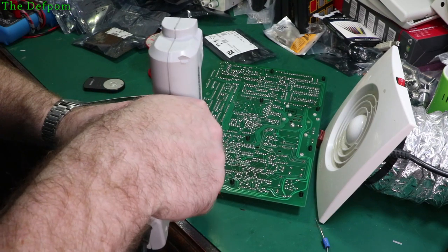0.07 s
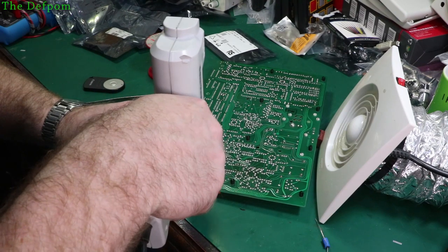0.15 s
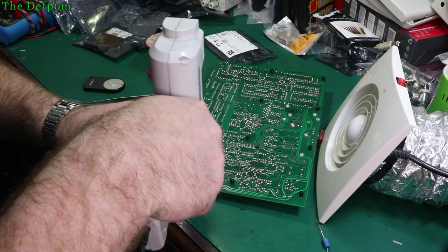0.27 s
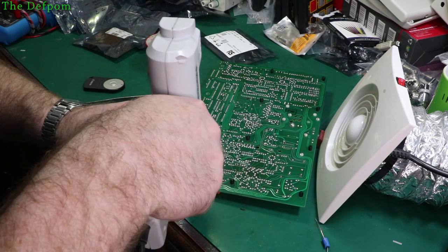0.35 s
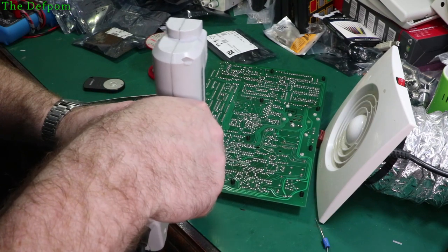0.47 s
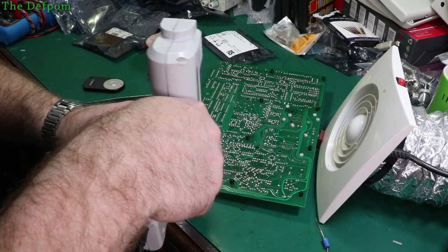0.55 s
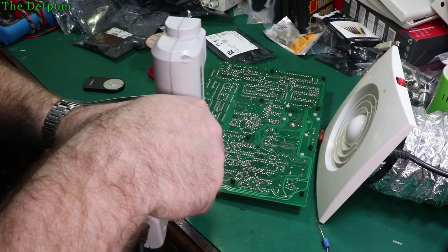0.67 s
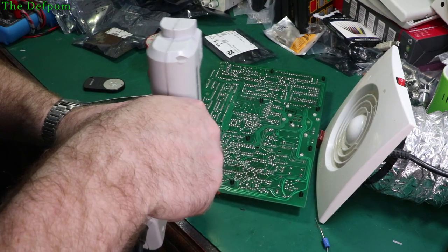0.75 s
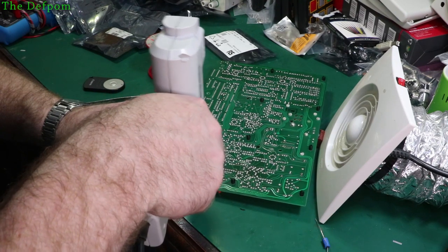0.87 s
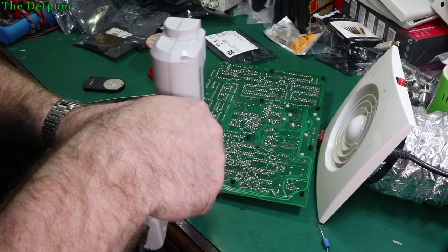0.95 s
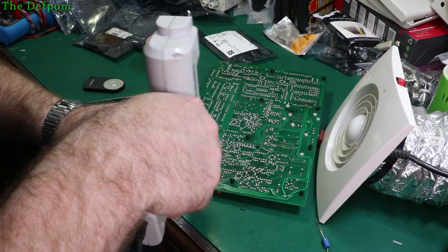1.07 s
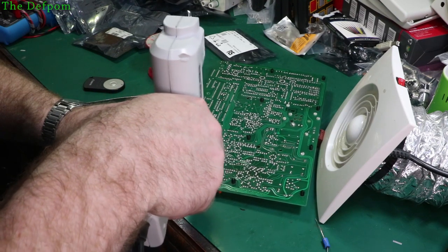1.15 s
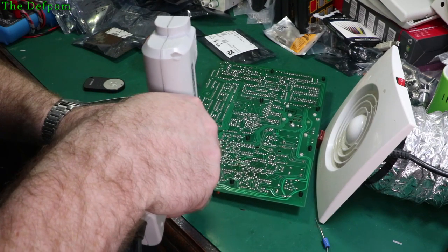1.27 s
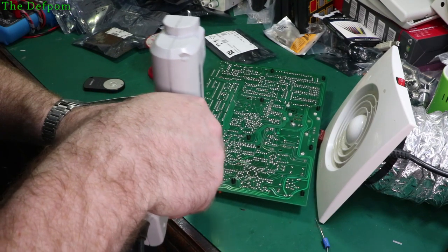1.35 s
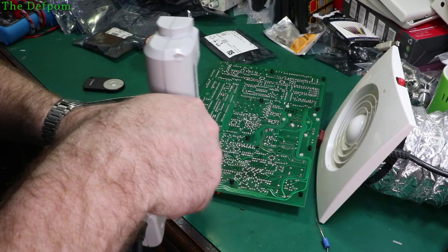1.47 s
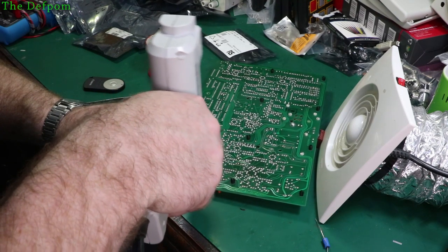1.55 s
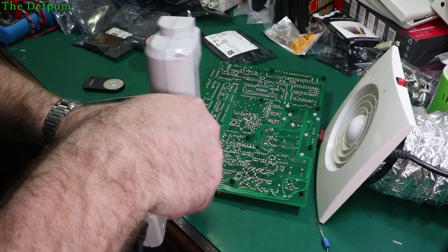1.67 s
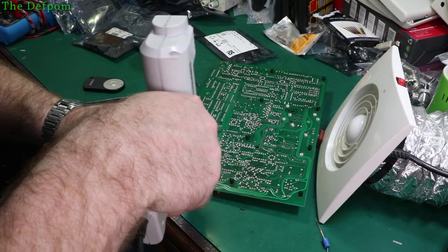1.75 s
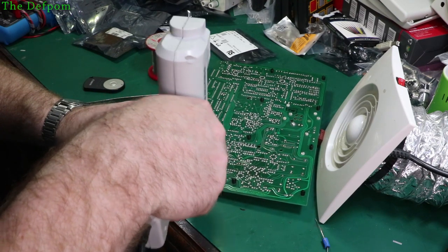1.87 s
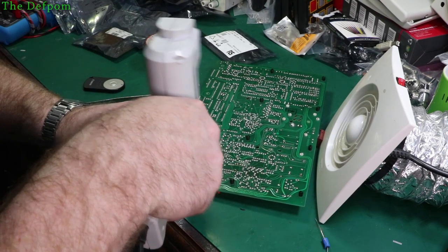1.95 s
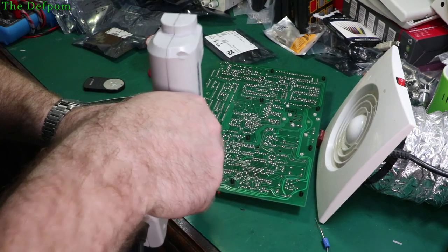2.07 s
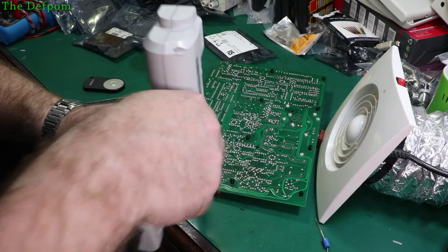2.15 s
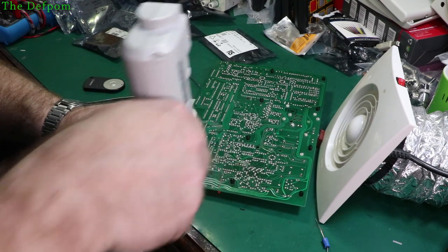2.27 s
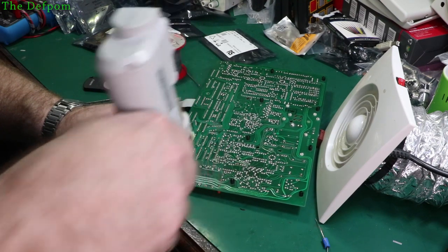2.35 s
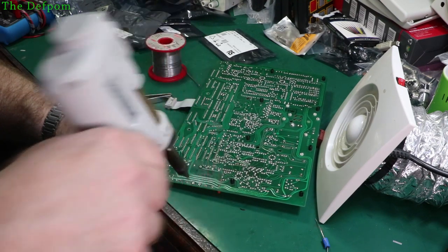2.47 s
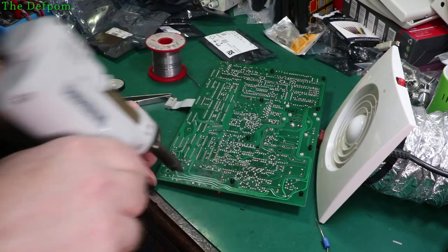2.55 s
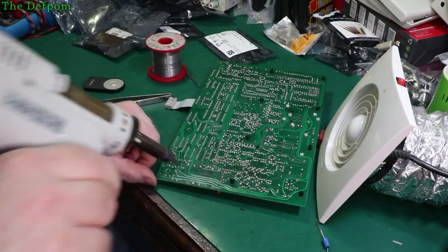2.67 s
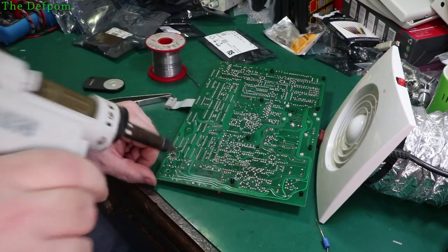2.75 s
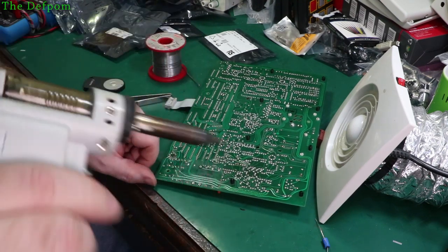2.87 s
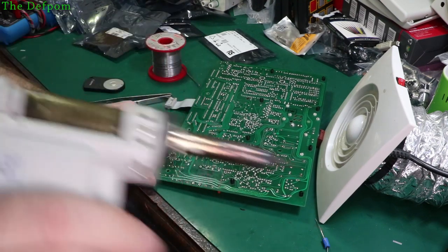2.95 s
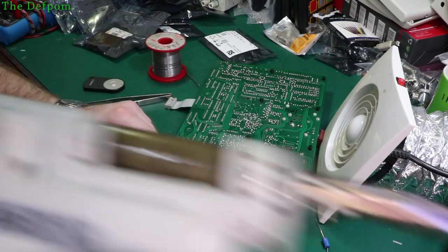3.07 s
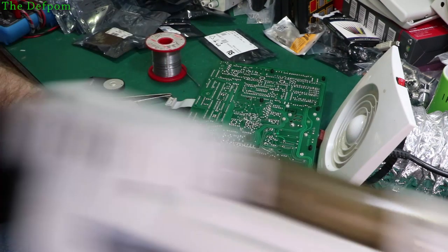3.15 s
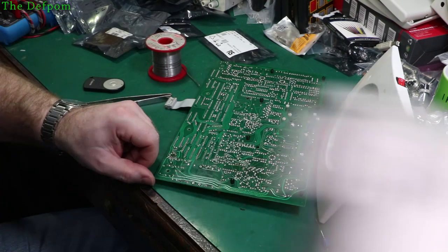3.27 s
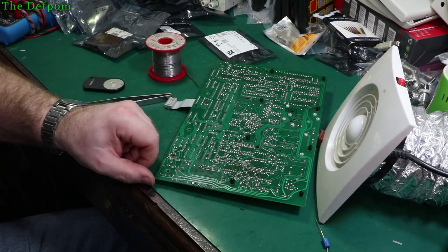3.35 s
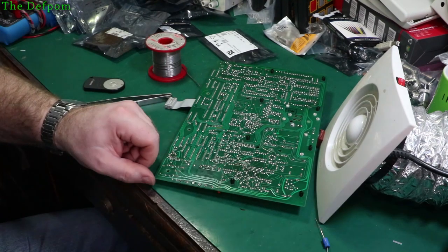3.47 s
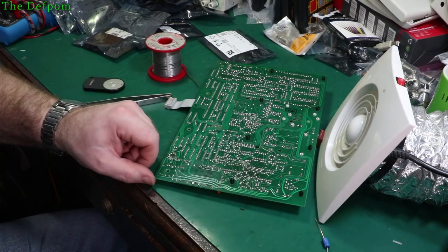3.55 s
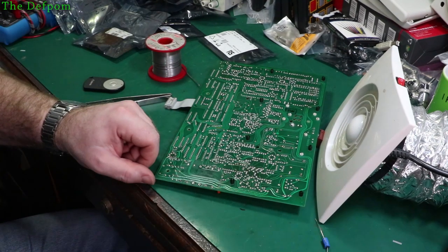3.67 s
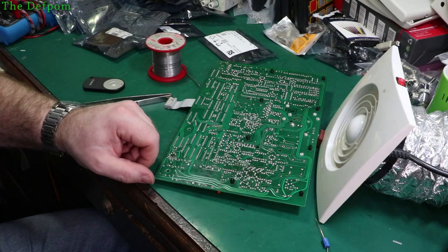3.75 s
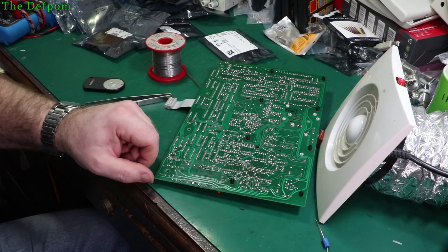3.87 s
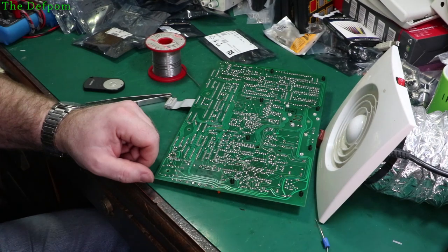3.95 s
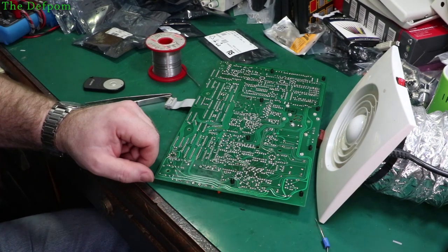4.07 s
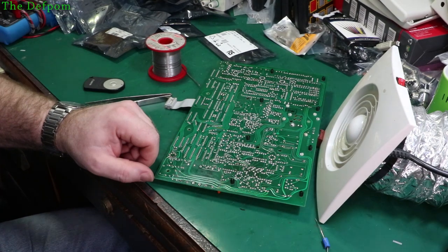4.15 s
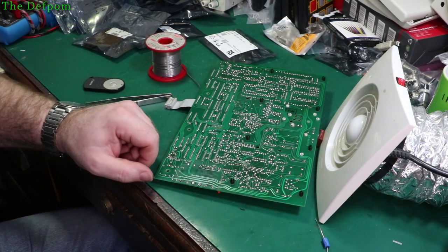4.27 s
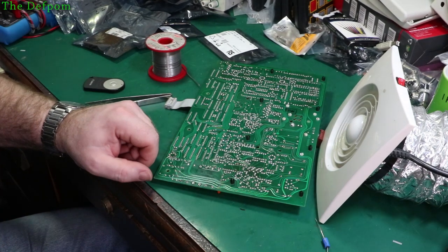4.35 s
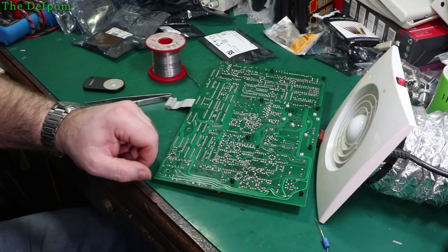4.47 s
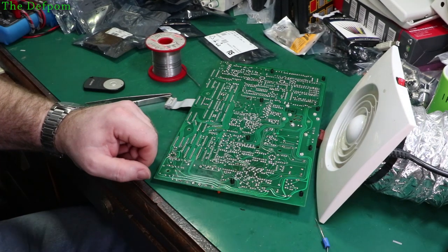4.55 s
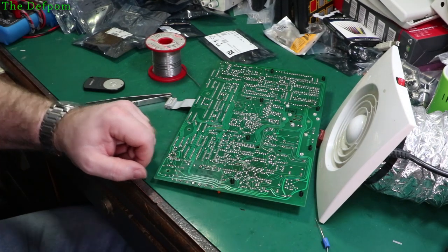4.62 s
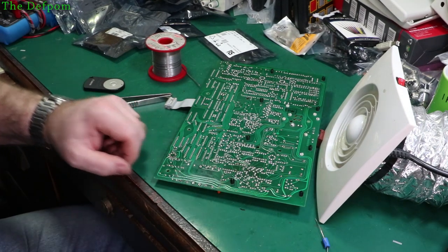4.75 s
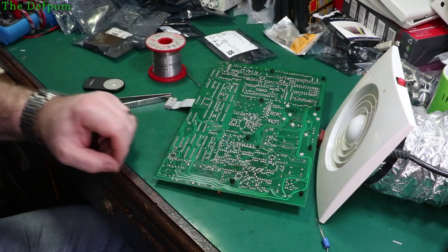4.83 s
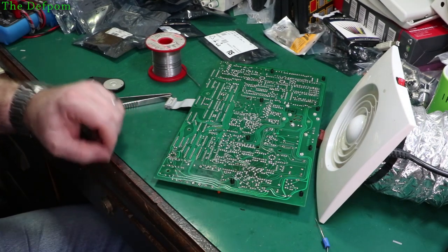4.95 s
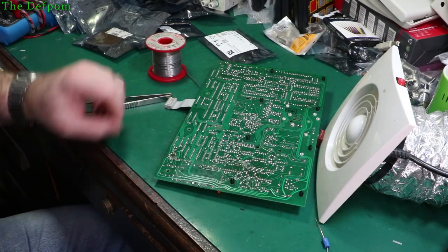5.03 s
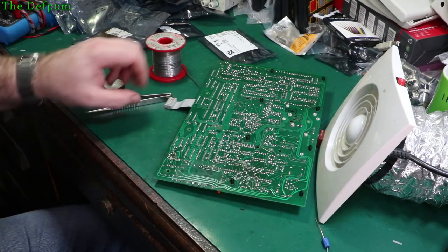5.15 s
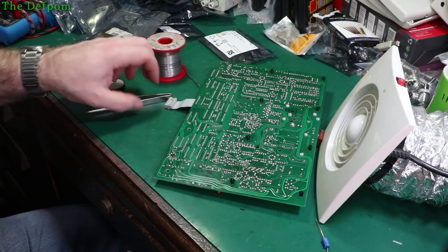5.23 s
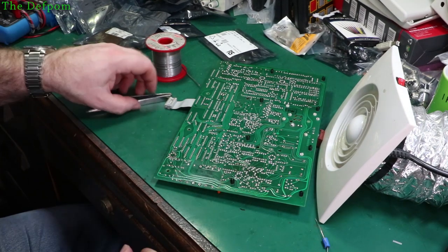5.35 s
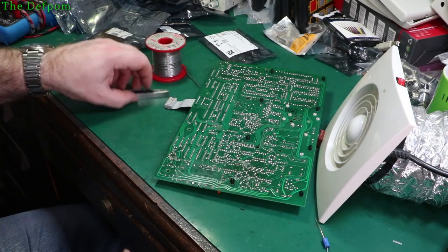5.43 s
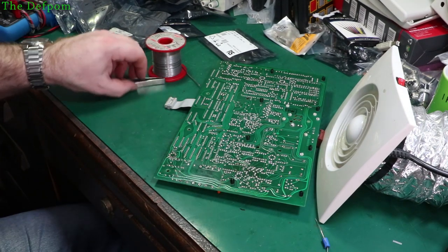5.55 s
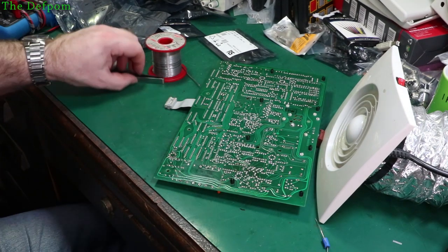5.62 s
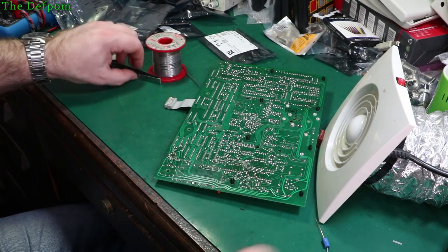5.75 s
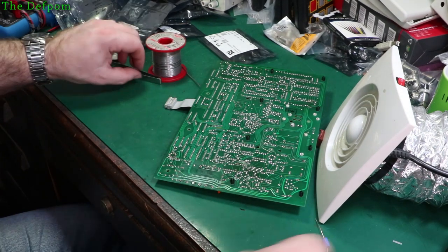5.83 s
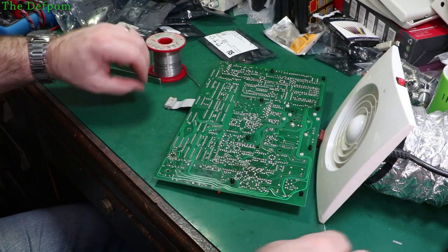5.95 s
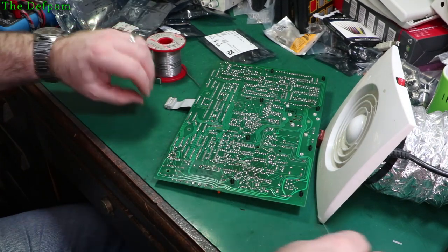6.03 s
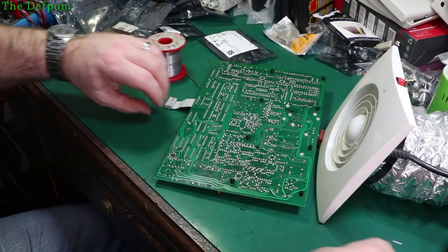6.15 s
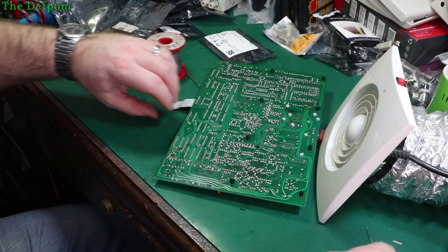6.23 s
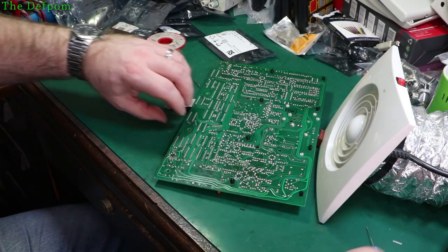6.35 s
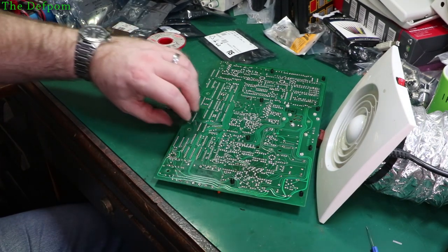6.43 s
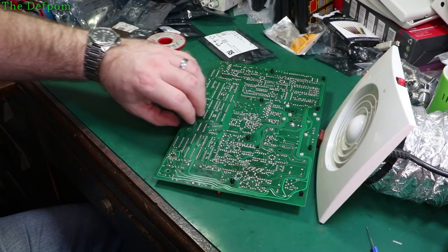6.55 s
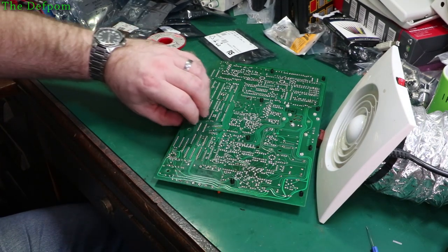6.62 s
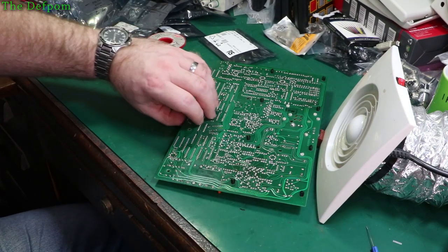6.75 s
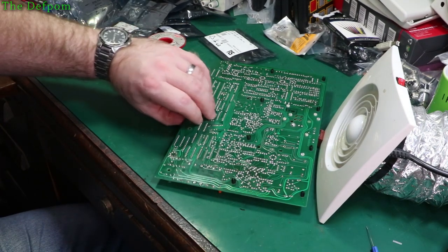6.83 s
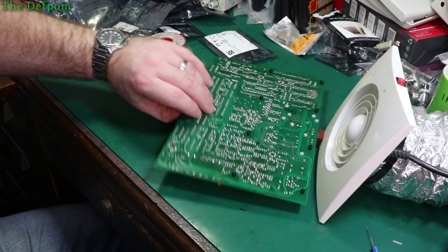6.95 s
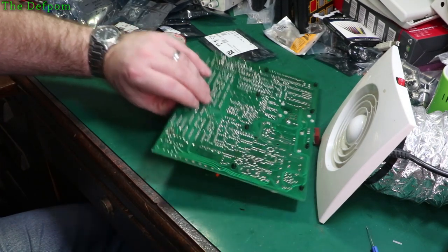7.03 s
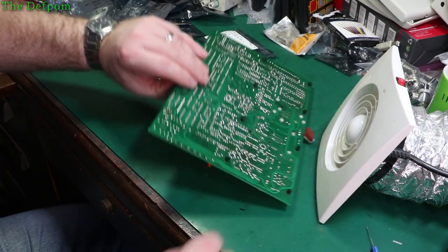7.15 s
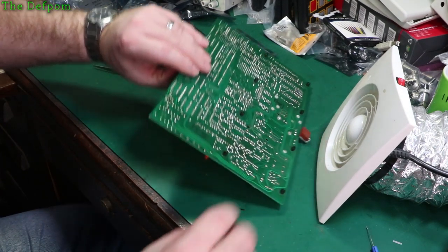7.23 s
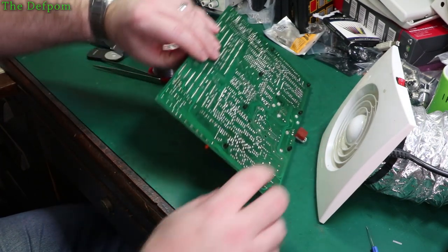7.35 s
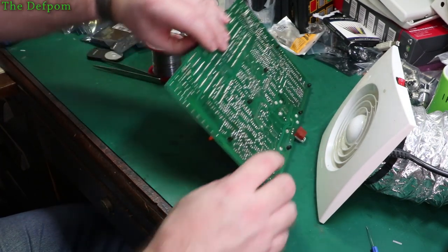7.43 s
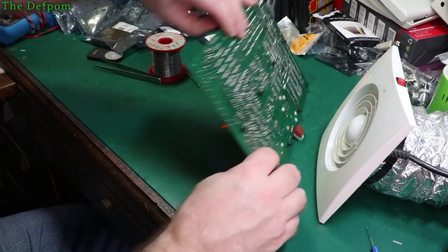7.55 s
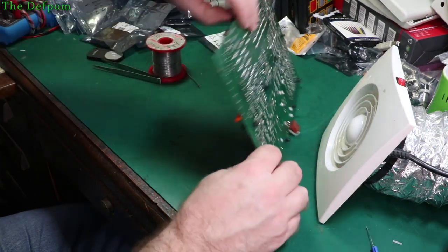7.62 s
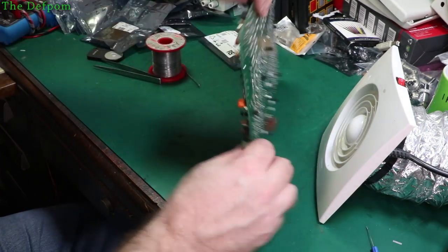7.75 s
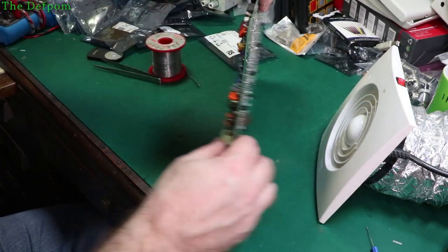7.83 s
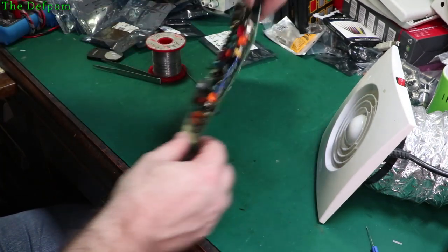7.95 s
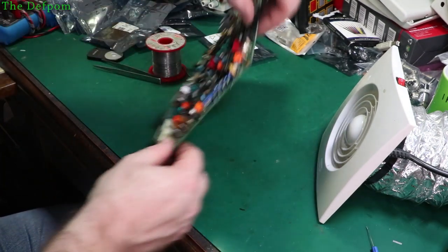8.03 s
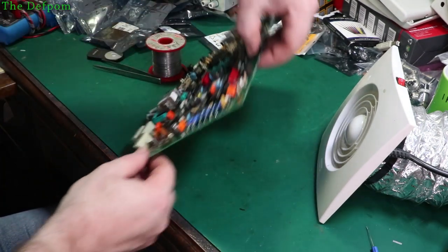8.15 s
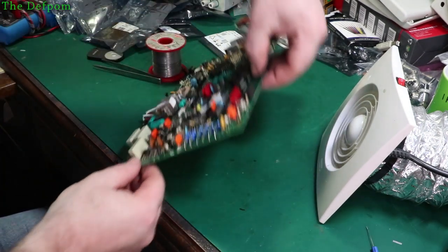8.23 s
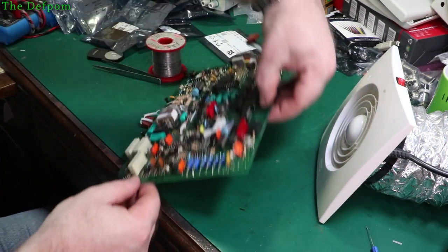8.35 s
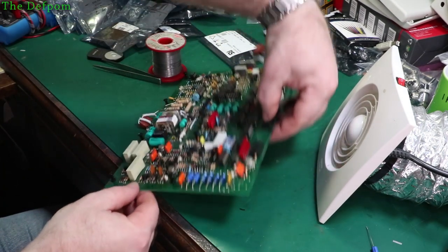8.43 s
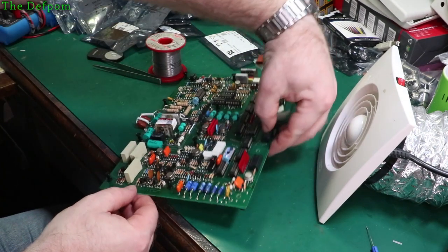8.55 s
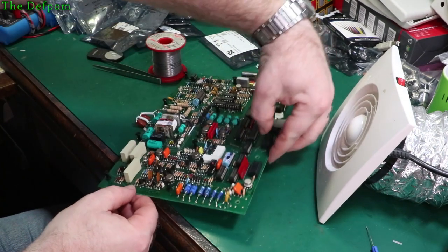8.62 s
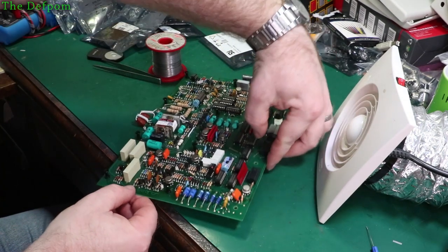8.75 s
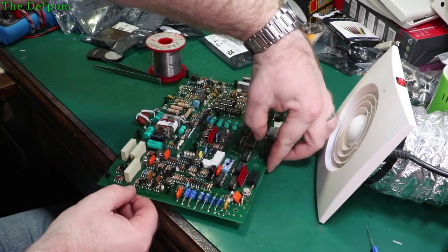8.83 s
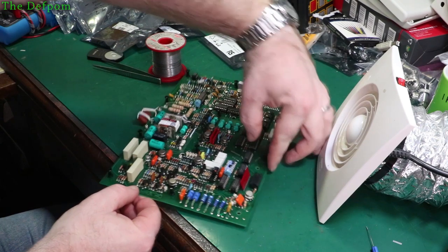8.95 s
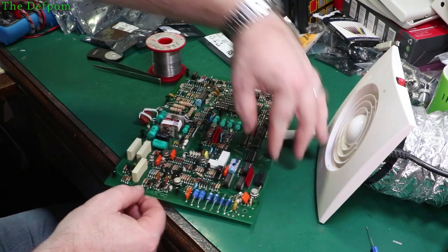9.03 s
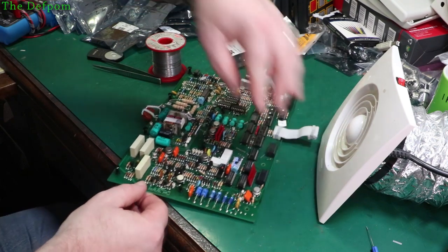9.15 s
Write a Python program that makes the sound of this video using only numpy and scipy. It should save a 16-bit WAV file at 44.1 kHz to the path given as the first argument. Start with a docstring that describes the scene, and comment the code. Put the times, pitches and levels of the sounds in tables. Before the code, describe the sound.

On a repair bench, a trigger clicks and a small diaphragm pump in a handheld desoldering gun buzzes loudly for about two seconds, then rattles to a stop. A soft fan rush swells up and stays. The gun is set down with clacks and a dull bench thump, tweezers clink, and a circuit board is turned over with light taps. Close stereo microphone, small dry workshop.

```python
"""A fume extractor fan rushes beside a repair bench: noise coloured by duct and grille, with motor tones.
A trigger clicks, and a desoldering gun's diaphragm pump runs up, buzzes for two seconds and coasts down:
each turn of the crank knocks the housing, snaps the valves and puffs air, while the fan is much quieter.
The fan swells back and stays. The gun is set down, steel tweezers clink, and a circuit board is lifted,
turned over and laid on the mat: cracks, damped modes and swells of sliding noise, with a short room tail."""
import sys
import numpy as np
from scipy import signal
from scipy.fft import rfft, irfft, next_fast_len
from scipy.io import wavfile
from scipy.ndimage import uniform_filter1d, map_coordinates

SR = 44100
rng = np.random.default_rng(int(sys.argv[2]) if len(sys.argv) > 2 else 0)


def wav_out(sig):
    """Save sig, one row per channel (or a flat mono array), as 16-bit PCM at SR to the path in sys.argv[1]."""
    wavfile.write(sys.argv[1], SR, np.round(np.clip(np.atleast_2d(sig).T, -1, 1) * 32767).astype(np.int16))


N = 405279
TIME = np.arange(N) / SR

FULL_HZ = 106.5  # nominal stroke rate at full speed
ON_S, OFF_S = 0.092, 2.078  # trigger pulled and let go

# The hands work from the right towards the middle. # Each row: time in seconds, level of left over right in dB.
HAND_BALANCE = [(3.2, -4), (4.2, -5.5), (6.1, 0.5), (7.2, -1.5), (8.2, 0.5)]


def amp(db):
    """Decibels to gain: twenty decibels are a factor of ten in pressure."""
    return 10 ** (np.asarray(db) / 20)


def unit(x):
    """Normalise the mean power, giving rms 1."""
    return x / np.sqrt(np.mean(x ** 2) + 1e-20)


def along(points, hz):
    """Interpolate (frequency, value) points on a logarithmic frequency axis, as pitch is heard."""
    f, v = np.transpose(points)
    return np.interp(np.log(hz + 1), np.log(f + 1), v)


def wobble(rate):
    """Slow random modulation: a smooth curve through random knots, rate of them a second."""
    coarse = TIME[::32]
    knots = rng.standard_normal(int(N * rate / SR) + 4)
    return np.interp(TIME, coarse, map_coordinates(knots, [coarse * rate]))


def since(s):
    """Elapsed time in seconds since s, zero before it."""
    return np.maximum(TIME - s, 0)


def pan(db):
    """Constant-power panning: gains for a level of left over right in dB."""
    half_db = np.atleast_1d(db) / 2
    gains = amp(np.array([half_db, -half_db]))
    return gains / np.sqrt(np.mean(gains ** 2, axis=0))


def hand_pan(s):
    """Panning by level difference towards where the hands are at s seconds."""
    return pan(np.interp(s, *np.transpose(HAND_BALANCE)))


def filtered(x, response):
    """Linear filtering: multiply the spectrum of x by a response of frequency."""
    n = x.shape[-1]
    m = 2 * next_fast_len(n // 2 + 4096)
    return irfft(rfft(x, m) * response(np.fft.rfftfreq(m, 1 / SR)), m)[..., :n]


def causal(db):
    """Minimum phase by the folded cepstrum: a response with these levels rings only after its cause."""
    cepstrum = irfft(np.log(amp(np.maximum(db, -110))))
    half = len(cepstrum) // 2
    return np.exp(rfft(np.r_[cepstrum[0], 2 * cepstrum[1:half]], 2 * half))


def stereo_noise(size):
    """Diffuse-field coherence: white noise, alike at both ears in the bass and less so in the treble."""
    # Each row: frequency in Hz, left-right correlation from -1 to 1.
    coherence = [(60, 0.51), (150, 0.97), (380, 0.88), (950, 0.67), (2380, -0.16), (5980, 0.058),
                 (15000, 0.027)]

    def shares(hz):
        turn = np.arccos(np.clip(along(coherence, hz), -1, 1)) / 2
        return np.array([np.cos(turn), np.sin(turn)])
    mid, side = filtered(rng.standard_normal((2, size)), shares)
    return np.array([mid + side, mid - side])


def rush(spectrum):
    """Turbulence noise: stereo noise of rms 1 shaped by a spectral density in dB."""
    return unit(filtered(stereo_noise(N), lambda hz: amp(along(spectrum, hz))))


def add(track, s, sound):
    """Superposition: mix a sound into the track at s seconds."""
    part = track[:, round(s * SR):][:, :sound.shape[-1]]
    part += sound[..., :part.shape[1]]


def scattered(x, tail, t60, wet=2):
    """All-pass dispersion: reflections off the bench clutter smear each pulse and keep its colour."""
    tail = tail * amp(-60 * TIME[:tail.shape[-1]] / t60)
    tail = wet * tail / np.linalg.norm(tail, axis=-1, keepdims=True)
    # only the phase of direct sound plus reflections is used
    return filtered(x, lambda hz: np.exp(1j * np.angle(1 + rfft(tail, 2 * len(hz) - 2))))


def struck(modes, attack):
    """Modal synthesis: exponentially damped modes of alternating sign, at slightly new strengths."""
    t = TIME[:SR // 2]
    ring = 0
    for k, (hz, db, t60) in enumerate(modes):
        decay = amp(db + rng.normal(0, 1) - 60 * t / t60)
        ring = ring + (-1) ** k * decay * np.sin(2 * np.pi * hz * t)
    return ring * (1 - np.exp(-t / attack))


def favouring(modes, pitch, focus_db):
    """Modal excitation: the place where a blow lands favours the modes near one pitch."""
    return [(hz, db - focus_db * abs(np.log2(hz / pitch)), t60) for hz, db, t60 in modes]


def fan_level():
    """Gain envelope: low before the buzz, lower under it, then a step up and a swell to the steady level."""
    steady_db = -38.5
    before_db, under_db, return_db = -9.5, -18.5, -7.5  # against the steady level
    return_s, swell_s = 2.615, 0.42  # time of the step up, length of the swell
    swell_db = return_db * np.maximum(1 - since(return_s) / swell_s, 0)
    return amp(steady_db + np.select([TIME < ON_S, TIME < return_s], [before_db, under_db], swell_db))


def fan():
    """Flow noise and tones: air drones in the duct and hisses in the grille, over slightly unsteady tones."""
    # Each row: frequency in Hz, relative level in dB per Hz.
    duct_spectrum = [(15, -50), (25, -28), (118, -15.5), (162, 1.5), (211, -2), (227, -4), (258, -3.5),
                     (326, -8.5), (411, -0.5), (441, 0), (475, -1), (590, -6), (616, -19), (682, -6.5),
                     (800, -36), (1040, -18), (1760, -120)]
    # Each row: frequency in Hz, relative level in dB per Hz.
    grille_spectrum = [(440, -8.5), (750, -6.5), (1160, -1.5), (1300, -5.5), (1560, -3.5), (1680, -5),
                       (2120, -2.5), (2630, -8), (3030, -5.5), (4010, -12), (4500, -14), (5970, -19),
                       (15000, -31.5), (16000, -46)]
    # Motor and blade tones. Each row: frequency in Hz, mean level in dB relative to rms 1.
    blade_tones = [(50, -50), (99.5, -26.5), (120, -34), (200, -16), (263, -19.5), (300.5, -17.5),
                   (477, -15), (519, -14.5), (683, -22.5), (1130, -20.5), (1560, -23)]
    # Each row: frequency in Hz, level of left over right in dB.
    balance = [(60, -1.5), (180, -0.5), (550, 0), (1650, -2.5), (4970, -2.5), (15000, 1)]
    tones = 0
    for hz, db in blade_tones:
        level = amp(db + 2.2 * wobble(2.983)) * np.sqrt(2)
        tones = tones + level * np.sin(2 * np.pi * hz * TIME + wobble(5))
    duct = amp(-4.0 + 0.54 * wobble(9.9)) * rush(duct_spectrum)
    grille = amp(-0.5 + 0.6 * wobble(2.89)) * rush(grille_spectrum)  # the hiss is nearly steady
    return filtered((duct + grille + tones) * fan_level(), lambda hz: pan(along(balance, hz)))


def contacts(ripple_db, crack, ring_db, soft):
    """Impact excitation: a crack and a dense, short ring of plastic or board, strongest around one pitch."""
    # Hard contacts of trigger, gun, tools and board. Each row: start in seconds, relative level in dB,
    # relative bass (body) in dB, relative treble (edge) in dB, ring pitch in Hz, burst t60 in seconds.
    touches = [(0.0765, -26.5, -15, -15, 3050, 0.039), (0.096, -28.5, -12, 1.5, 5500, 0.033),
               (2.924, -37, -20, 3.5, 7000, 0.019), (3.031, -31, -14, -4, 5500, 0.025),
               (3.076, -32.5, -20, 2, 13500, 0.024), (3.128, -29, -16, -5, 5000, 0.016),
               (3.2042, -16, -15, -24.5, 1700, 0.017), (3.344, -25, -18, -13, 2400, 0.034),
               (3.348, -15.5, -24, -15, 2200, 0.03), (3.3902, -19, -18, -13, 2500, 0.037),
               (3.491, -30, -16, -9, 5800, 0.02), (3.5493, -26.5, -4.5, -20, 2960, 0.05),
               (3.571, -34.5, -18, 0, 7500, 0.016), (3.723, -25.5, -7, -6, 3160, 0.028),
               (4.0805, -13.5, -9.5, -10, 2800, 0.06), (4.086, -16.5, -7, -11, 2200, 0.06),
               (4.121, -16, 2, -15, 3500, 0.053), (4.1245, -16.5, -3, -7, 1100, 0.055),
               (4.1855, -18, -17, -15.5, 2830, 0.053), (4.211, -17, -14, -4.5, 3250, 0.04),
               (5.6152, -18, -17, -11, 2000, 0.16), (5.7436, -18, -24, -4, 2650, 0.052),
               (6.101, -19.5, -27, -8.5, 2100, 0.08), (6.7524, -26, -11, -4.5, 1940, 0.036),
               (6.817, -33.5, -3, 0, 1500, 0.035), (7.076, -29, -12, -11, 3000, 0.048),
               (7.1955, -18, -8.5, -9, 2900, 0.2), (8.139, -27.5, -25, 1, 6000, 0.025),
               (8.1455, -19.5, -28, -3.5, 5600, 0.047), (8.176, -29, -22, -8, 5000, 0.03),
               (8.225, -26, -14, -3.5, 6020, 0.023), (9.036, -20.5, -20, -7, 5400, 0.068),
               (9.0572, -20, -15, -7, 5600, 0.027), (9.096, -26.5, -11, -20, 1300, 0.091)]
    track, t = np.zeros((2, N)), TIME[:SR // 4]
    grid = np.geomspace(200, 16000, 40)
    for s, db, body_db, edge_db, pitch, t60 in touches:
        peak = ring_db * np.exp(-(np.log2(grid / pitch) / .4) ** 2)
        ripple = np.c_[grid, ripple_db * rng.standard_normal(len(grid)) + peak]
        colour = [(25, body_db - 26), (60, body_db - 8.5), (250, body_db + 11.0), (700, body_db + 7.5),
                  (1400, 1.0), (3500, -1.3), (7500, edge_db + 2.5), (15000, edge_db - 11.5)]
        attack = 1 - np.exp(-t * amp(db) / soft)  # lighter touches start more softly
        decay = amp(-60 * t / t60) + crack * amp(-60 * t / 0.0051)
        burst = stereo_noise(len(t)) * attack * decay
        ring = filtered(burst, lambda hz: causal(along(colour, hz) + along(ripple, hz)))
        add(track, s, amp(db + 4.0) * hand_pan(s) * ring)
    return track


def sway():
    """Periodic motion: the hand rocks the nozzle, more widely up to one peak as the solder lets go."""
    rate_hz, peak_s = 6.4, 1.335
    return np.cos(2 * np.pi * rate_hz * (TIME - peak_s)) * np.minimum(TIME / peak_s, 1)


def motor():
    """Inertia and load: stroke rate, force and rattle as the motor kicks, runs up, holds and coasts."""
    kick_hz, run_up_s = 50, 0.043  # deficit base at the first kick, time constant towards full speed
    sag_hz, settle_s = 1.0, 0.7  # the last of the speed comes slowly
    coast_hz_per_s, coast_db_per_octave = 600, 9.5  # off, it slows steadily and quietens with its speed
    creep_hz_per_s, sway_hz, wander_hz = 0.1, 0.2, 0.13  # the speed creeps up, sways and drifts
    run_db, attack_s, sway_db = -25.5, 0.031, 0.57  # force level, its rise, its change with the rocking
    inrush_db, inrush_s = 9, 0.082  # the motor pushes harder at first
    surge_s, surge_db, surge_rise_s = 1.03, 2, 0.019  # the buzz swells once, briefly
    rattle_running, rattle_slow, rattle_range_hz = 0.01, 0.44, 11  # roughness at speed, added when slow

    on = since(ON_S)
    lost_hz = (FULL_HZ - kick_hz) * np.exp(-on / run_up_s) + coast_hz_per_s * since(OFF_S)
    drift_hz = creep_hz_per_s * TIME + sway_hz * sway() + wander_hz * wobble(10)
    speed = np.maximum(FULL_HZ + drift_hz - lost_hz - sag_hz * np.exp(-on / settle_s), 2)

    surge = since(surge_s) / surge_rise_s
    level_db = run_db + inrush_db * np.exp(-on / inrush_s)
    level_db = level_db + surge_db * surge * np.exp(1 - surge) - sway_db * sway()
    coast_db = coast_db_per_octave * np.log2(speed / FULL_HZ) * (TIME > OFF_S)
    force = amp(level_db + coast_db) * np.minimum(on / attack_s, 1) ** 0.94
    rattle = rattle_running + rattle_slow * np.tanh(lost_hz / rattle_range_hz)
    return speed, force, rattle


def pulses(turns, speed, lag):
    """Band-limited impulses: one short windowed sinc a turn, lag turns late."""
    offset = ((turns - lag) % 1 - .5) * SR / speed
    return np.sinc(offset) * np.exp(-(offset / 6) ** 2)


def puffs(turns, lag, sharp):
    """Periodic flow envelope: one rounded swell a turn, of rms 1."""
    return unit(np.exp(-sharp * np.cos(2 * np.pi * (turns - lag))))


def running(x):
    """Reference level: scale to rms 1 over the stretch at full speed."""
    return x / np.sqrt(np.mean(x[..., SR // 2:2 * SR] ** 2))


def housing(turns, speed, rattle, forward, back):
    """Forced vibration: diaphragm hum, stroke knocks and clatter drive the resonant housing."""
    # The gun's body at full speed. Each row: multiple of the stroke rate, relative level in dB.
    orders = [(1, -23.5), (2, -9), (3, -27.5), (4, -12), (5, -7), (6, -10), (7, -19), (8, -22.5), (9, -8.5),
              (10, -4), (11, 3), (12, -9.5), (13, -16), (14, -6.5), (15, -6.5), (16, -13), (17, -13),
              (18, -27), (19, -9), (20, -10.5), (21, -23), (22, -20), (23, -3.5), (24, -13), (25, -7.5),
              (26, -18), (27, -13.5), (28, -18.5), (29, -26.5), (30, -22.5), (31, -12.5), (32, -18),
              (33, -24), (34, -21.5), (35, -17), (36, -17.5), (37, -38)]
    # A further resonance of the housing: frequency in Hz, relative level in dB.
    housing_ring = (1300, -0.6)
    # Each row: frequency in Hz, phase in radians by which the left ear leads.
    ear_phase = [(500, -0.11), (960, -1.35), (1170, -0.31), (1280, -0.14), (1500, -1.8), (2000, 1.4),
                 (2450, -0.93), (2900, -0.75), (4000, 1.8)]
    # the lowest orders come straight from the diaphragm and fade quickly as it slows
    low, high = orders[:4], orders[4:]
    hum = sum(amp(db) * np.cos(2 * np.pi * (k * turns + rng.random())) for k, db in low)
    hum = hum * (speed / FULL_HZ) ** 3
    # the piston knocks at both ends of its travel: a push going in, a to-and-fro jerk coming back
    strokes = running(forward + 0.7 * filtered(back, lambda hz: 1j)) * amp(0.11 * wobble(75.0))
    strokes = scattered(strokes, rng.standard_normal(size=4096), t60=0.08, wet=0.8)
    # off speed, loose parts clatter at uneven strengths
    clatter = rattle * amp(2.2 * wobble(60)) * puffs(turns, 0, sharp=1.2) * rng.standard_normal(N)
    clatter_low_hz, clatter_high_hz = 650, 3000
    body = [(60, -64), (280, -12), housing_ring, (4150, -26.0), (4700, -66), (6000, -100)]
    body = sorted(body + [(k * FULL_HZ, db) for k, db in high])
    knocks = filtered(strokes * (1 - 0.5 * rattle), lambda hz: 1 / (1 + (470 / (hz + 1)) ** 16))
    knocks = knocks + filtered(
        clatter, lambda hz: 1.13 / (1 + (clatter_low_hz / (hz + 1)) ** 3 + (hz / clatter_high_hz) ** 2))
    knocks = filtered(knocks, lambda hz: causal(along(body, hz)))
    # a reflection off the moving hand makes the upper harmonics waver
    echo_s = 0.001348
    echo = filtered(knocks, lambda hz: np.exp(-2j * np.pi * hz * echo_s) * hz / (hz + 1200))
    knocks = knocks + (0.2 * wobble(8.1) + 0.048 * sway()) * echo
    buzz = running(knocks + 2 * np.sqrt(FULL_HZ / SR) * hum)
    return filtered(buzz, lambda hz: np.exp(.5j * np.outer([1, -1], along(ear_phase, hz))))


def valves(turns, speed, back):
    """Impulsive valve closure: inlet and outlet valves snap about half a turn apart."""
    # Each row: frequency in Hz, relative level in dB.
    snap_spectrum = [(2350, -48), (3700, -7), (4150, 1), (4450, 3.5), (4800, -3.5), (5130, -15), (5480, -9),
                     (5890, -12), (7190, -7), (8300, -13.5), (9220, -10), (9530, -16), (13800, -21),
                     (15000, -44)]
    snaps = running(pulses(turns, speed, -0.0315) + 0.51 * back) * amp(1.03 * wobble(110))
    snaps = scattered(snaps, stereo_noise(size=2048), t60=0.049)
    return running(filtered(snaps, lambda hz: causal(along(snap_spectrum, hz))))


def air(turns):
    """Pulsating jet noise: air rushes steadily and swells with every stroke."""
    # Each row: frequency in Hz, relative level in dB per Hz.
    jet_spectrum = [(530, -31), (900, -10), (1180, -23), (1370, -2), (1850, -6), (1920, -16), (2060, -4.5),
                    (2500, -3), (3120, -2), (4430, -18), (5150, -11.5), (6500, -9.5), (14500, -29)]
    return running(rush(jet_spectrum) * (puffs(turns, -0.025, sharp=0.32) + 1.0) * amp(2.2 * wobble(69)))


def spits(turns):
    """Pressure release: once a turn the outlet valve bursts open with a spit of air of random size."""
    # Each row: frequency in Hz, relative level in dB per Hz.
    spit_spectrum = [(3500, -30), (5400, -3), (7300, 0), (8500, -7), (11300, -13), (14000, -15),
                     (15500, -35)]
    lead, decay, scatter_db = 0.17, 0.17, 3.2  # turns ahead of the knock, decay in turns, spread in size
    stroke, phase = np.divmod(np.maximum(turns + .5 + lead, 0), 1)
    sizes = amp(scatter_db * rng.standard_normal(size=1024))
    hiss = filtered(rng.standard_normal((2, N)), lambda hz: amp(along(spit_spectrum, hz)))
    return hiss * sizes[stroke.astype(int)] * np.exp(-phase / decay)


def crank(slaps, chatter):
    """Impulse response: slaps and jolts ring the loose parts, which chatter briefly after each jolt."""
    # The crank jolts the housing as it starts and stops. Each row: time in seconds, relative level in dB.
    jolts = [(0.1136, -9.5), (0.128, -11.5), (2.105, -28), (2.12, -22.5), (2.133, -20), (2.165, -29),
             (2.191, -35), (2.2273, -35.5), (2.257, -45)]
    # Crank and loose parts. Each row: frequency in Hz, relative level in dB, t60 in seconds.
    loose_modes = [(325, -5.5, 0.024), (540, -11, 0.019), (784, -6, 0.02), (1120, 4, 0.038),
                   (1480, -12, .016), (1694, 1.5, 0.028), (2490, -3, 0.014), (2730, -17, 0.013),
                   (3400, -9, 0.016), (4450, -16, .012)]
    blows, t = slaps.copy(), TIME[:SR // 40]
    for s, db in jolts:
        jolt = chatter * rng.standard_normal(len(t)) * amp(-60 * t / 0.041)
        jolt[0] = 1
        blows[round(s * SR):][:len(t)] += amp(db) * jolt / np.linalg.norm(jolt)
    return signal.fftconvolve(blows, struck(loose_modes, attack=0.00031))[:N] / 2


def pump():
    """Reciprocating machine: each turn drives the diaphragm, knocks the housing, snaps valves, puffs air."""
    # Where the buzz comes from. Each row: frequency in Hz, level of left over right in dB.
    balance = [(400, -2), (530, 3), (960, -1.5), (1170, -5.5), (1350, -1), (1600, -7), (2000, 3),
               (2450, -7.5), (3300, -1), (8000, 1)]
    speed, force, rattle = motor()
    turns = np.cumsum(speed * (TIME > ON_S)) / SR
    turns = turns + (0.00061 + 0.038 * rattle) * wobble(90) + 0.0028 * wobble(8.86)  # uneven timing
    forward, back = pulses(turns, speed, 0), pulses(turns, speed, .5)
    slaps = amp(1.5 + 3.1 * wobble(70)) * rattle * force * forward
    buzz = housing(turns, speed, rattle, forward, back)
    flow = amp(-14.0 + 0.34 * wobble(7.36)) * valves(turns, speed, back)
    flow = flow + amp(-17.0 + 1.2 * wobble(6.9)) * air(turns)
    flow = flow + amp(-23.5) * running(spits(turns))
    sound = force * (amp(0.5) * buzz + flow * speed / FULL_HZ) + crank(slaps, chatter=0.045)
    return filtered(sound, lambda hz: pan(along(balance, hz)))


def rubs(grain_db, slope_db):
    """Stick-slip friction: a swell of tiny slips, random in time and pitch around one broad centre."""
    # Sliding of cable, hand and board. Each row: start in seconds, length in seconds, level in dB,
    # centre in Hz before a treble roll-off.
    slides = [(3.0, 0.14, -44, 7500), (3.288, 0.085, -42, 2800), (3.67, 0.061, -50, 7000),
              (5.728, 0.017, -35, 4000), (6.007, 0.053, -36.5, 2480), (6.173, 0.042, -43.5, 7000),
              (7.075, 0.056, -36.5, 3570), (7.219, 0.03, -32, 9000), (8.439, 0.042, -38, 3600),
              (9.01, 0.039, -31.5, 3450)]
    track, t = np.zeros((2, N)), TIME[:SR // 3]
    for s, length, db, pitch in slides:
        z = signal.stft(stereo_noise(len(t)), nperseg=128)[2]
        slips = uniform_filter1d(rng.standard_normal(z.shape[1:]), size=9, axis=0)
        slips = unit(uniform_filter1d(slips, size=2, axis=1))
        grains = signal.istft(z * amp(grain_db * slips), nperseg=128)[1][:, :len(t)]
        grains = filtered(
            grains, lambda hz: amp(-slope_db * np.log2((hz + 1) / pitch) ** 2) / np.sqrt(1 + hz / 3000))
        swell = np.sin(np.pi * np.minimum(t / length, 1) ** 0.78)
        add(track, s, amp(db) * unit(grains) * swell)
    return track


def rings():
    """Free vibration: case, stand, tool and board each ring with their own damped modes."""
    # Hits: each row is time in seconds, level in dB.
    # Modes: each row is frequency in Hz, relative level in dB, t60 in seconds.
    # the gun's hollow case bumps as it is carried off
    case_hits, case_modes = [(3.2055, -20.5)], [(307, -9.5, .1), (810, 2.5, 0.049), (1450, -13, 0.021),
                                                  (1690, -4, 0.03), (2500, -6, .03), (4560, -3, 0.014)]
    # the gun settles in its metal stand
    stand_hits, stand_modes = [(4.212, -21.5)], [(2950, -5, 0.044), (3370, 1, 0.059), (5895, -7, 0.069),
                                                   (8000, -10, 0.16), (10750, -17, .15), (13090, -14, .088)]
    # a small tool is dropped on the bench
    tool_hits, tool_modes = [(6.1015, -25)], [(1140, 0, 0.039), (1800, 1, 0.058), (2180, 0, 0.056),
                                                 (3530, 1, .06), (4840, 0, 0.09), (5841, -7, .11),
                                                 (6700, -6, 0.13), (8300, -3, .12), (11750, -11, .06),
                                                 (12800, -5, .05)]
    # the board's edge taps the bench
    board_hits, board_modes = [(7.195, -30), (8.146, -30), (9.0375, -39)], [(263, 0, 0.14), (1320, -8, 0.06), (2530, 0, 0.054),
                                                   (3236, -3.5, 0.046), (4000, -9, .1), (5700, -1, .1),
                                                   (6400, -2, .05)]
    track = np.zeros((2, N))
    for hits, modes in [(case_hits, case_modes), (stand_hits, stand_modes),
                        (tool_hits, tool_modes), (board_hits, board_modes)]:
        for s, db in hits:
            add(track, s, amp(db) * hand_pan(s) * struck(modes, attack=0.00035))
    return track


def thumps(focus_db):
    """Plate resonance: a dull blow rings the low modes of the bench."""
    # Each row: time in seconds, relative level in dB, pitch of the most favoured ring in Hz.
    blows = [(4.082, -21, 260), (4.1208, -7.5, 267), (4.19, -26, 300), (4.212, -30, 520), (7.198, -27, 298)]
    # Each row: frequency in Hz, relative level in dB, t60 in seconds.
    bench_modes = [(75, -25, 0.09), (225, 1.5, 0.067), (350, -2, 0.024), (490, -1.5, 0.041),
                   (738, -13, 0.06), (1023, -9, 0.088)]
    track = np.zeros((2, N))
    for s, db, pitch in blows:
        add(track, s, amp(db - 1.5) * struck(favouring(bench_modes, pitch, focus_db), attack=0.00022))
    return filtered(track, lambda hz: (1j * hz / (1j * hz + 60)) ** 2)


def tweezers(chatter, scrape_db, focus_db):
    """Repeated impact: steel arms chatter together, so that each clink is struck again many times."""
    # Tweezer arms touch. Each row: time in seconds, level in dB, pitch of the most favoured ring in Hz.
    clinks = [(5.546, -26.5, 11000), (5.576, -31.5, 8000), (5.614, -24, 11000), (5.62, -24, 9000),
              (5.634, -26, 6000)]
    # Each row: frequency in Hz, relative level in dB, t60 in seconds.
    steel_modes = [(3520, -10, .08), (5980, -0.5, 0.075), (6900, -6.5, 0.2), (8200, 2, 0.091),
                   (8320, -7, 0.082), (9140, -5, 0.09), (10760, -9, 0.19), (11700, -5, 0.1),
                   (13550, -16, .1), (14500, -16, .13)]
    scrape_colour = [(1000, -12), (6000, 3.0), (11000, -4), (15000, -22)]
    track, t = np.zeros((2, N)), TIME[:SR // 8]
    for s, db, pitch in clinks:
        touches = chatter * rng.standard_normal((2, len(t))) ** 3 * amp(-60 * t / 0.042)
        touches[:, 0] = 1
        arms = struck(favouring(steel_modes, pitch, focus_db), attack=0.00036)
        ring = signal.fftconvolve(touches, arms[None], axes=1)
        add(track, s, amp(db) * pan(3.3) * ring / np.linalg.norm(touches[0]))
        scrape = filtered(stereo_noise(len(t)), lambda hz: amp(along(scrape_colour, hz)))
        add(track, s, amp(db + scrape_db - 60 * t / 0.08) * scrape)
    return track


def room(x):
    """Reverberation: the small workshop answers with a short diffuse tail, shorter in the treble."""
    # Each row: frequency in Hz, t60 in seconds.
    reverb = [(200, 0.41), (2000, 0.24), (14000, 0.21)]
    hz, t, z = signal.stft(stereo_noise(SR // 2), SR, nperseg=256)
    tail = signal.istft(z * amp(-60 * t / along(reverb, hz)[:, None]), SR, nperseg=256)[1]
    tail = np.pad(tail, ((0, 0), (SR // 250, 0)))  # it begins 4 ms late
    return signal.fftconvolve(x, tail / np.linalg.norm(tail[0]), axes=1)[:, :N]


def scene():
    """Interaural delay and superposition: bench and fan reach the right ear a little sooner; add the pump."""
    handling = contacts(ripple_db=3.0, crack=0.88, ring_db=4.5, soft=.00005)
    handling = handling + rubs(grain_db=5.5, slope_db=4.5)
    handling = handling + tweezers(chatter=0.07, scrape_db=2, focus_db=3.5)
    bodies = rings() + thumps(focus_db=4.0)
    # dull blows carry little into the room
    reverberant = room(amp(-8.0) * handling + amp(-19) * bodies)
    bench = fan() + handling + bodies + reverberant
    lag_s = 5e-5
    return pump() + filtered(bench, lambda hz: np.exp(1j * np.pi * lag_s * np.array([-hz, hz])))


def record(dry):
    """Band limiting: the microphones shed the deepest bass and keep nothing from 15.9 kHz up."""
    top_hz = 15900
    return filtered(dry, lambda hz: (1j * hz / (1j * hz + 22)) ** 2 * (hz < top_hz))


dry = scene()
out = record(dry)
wav_out(out)
```